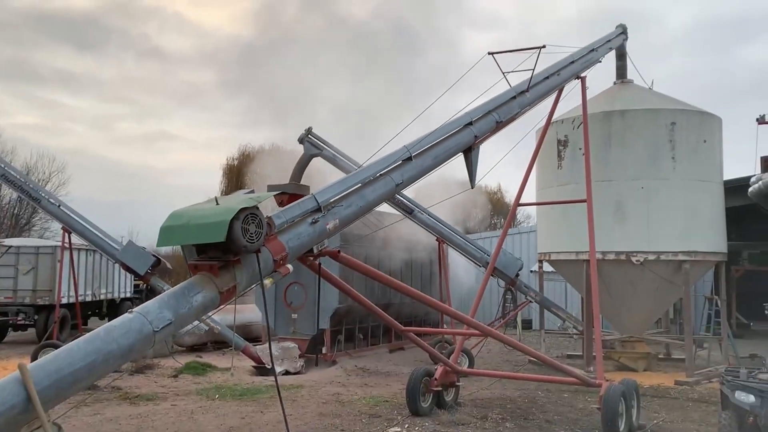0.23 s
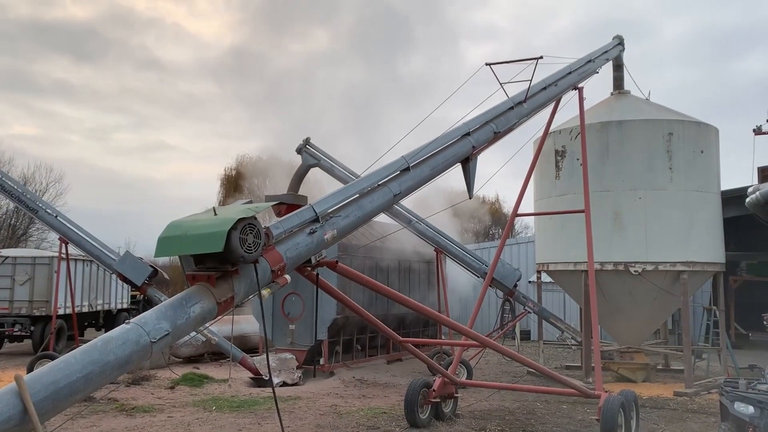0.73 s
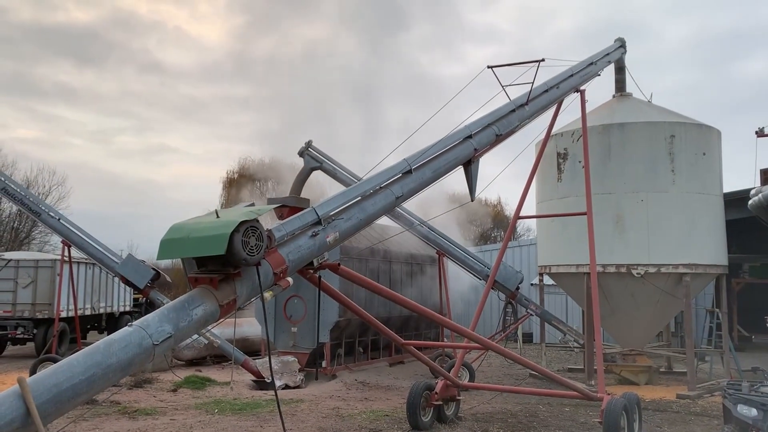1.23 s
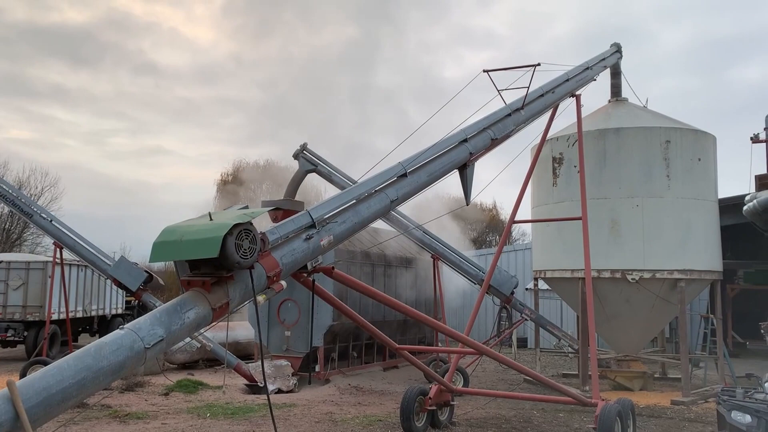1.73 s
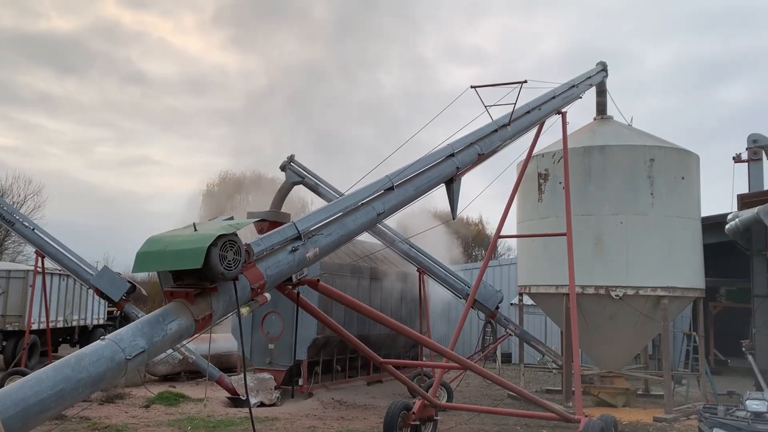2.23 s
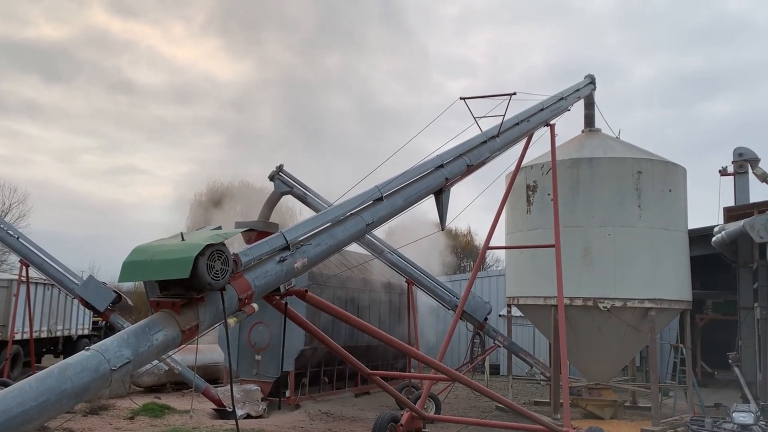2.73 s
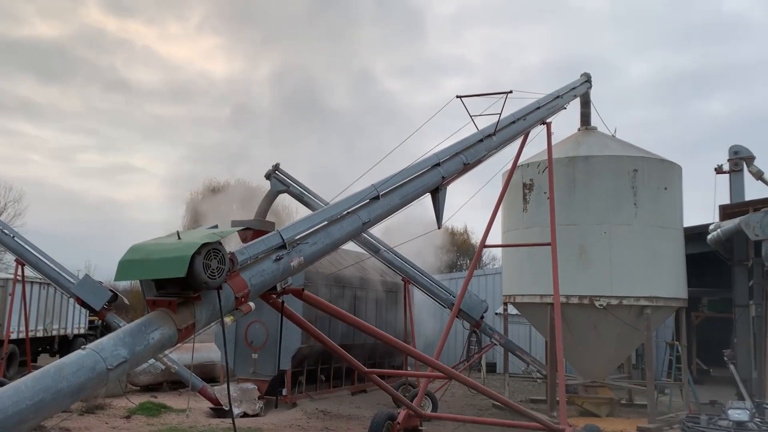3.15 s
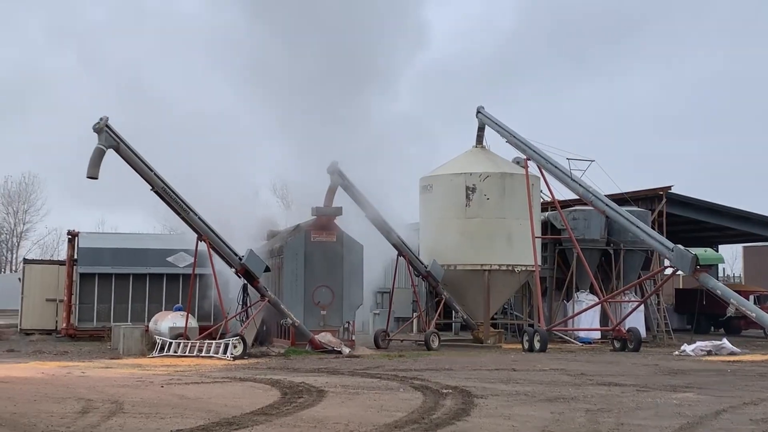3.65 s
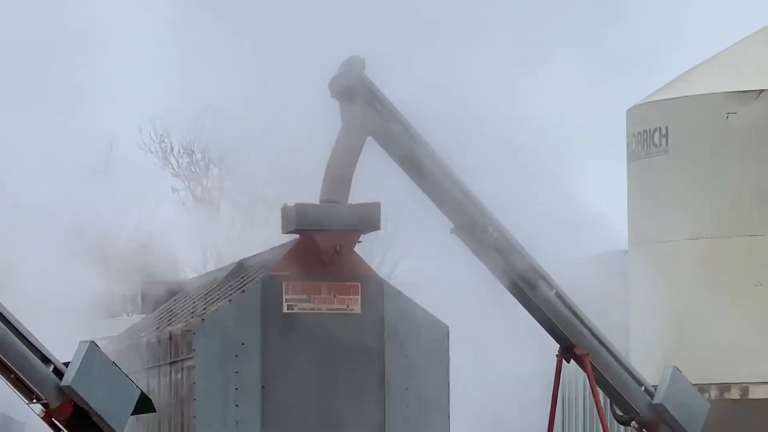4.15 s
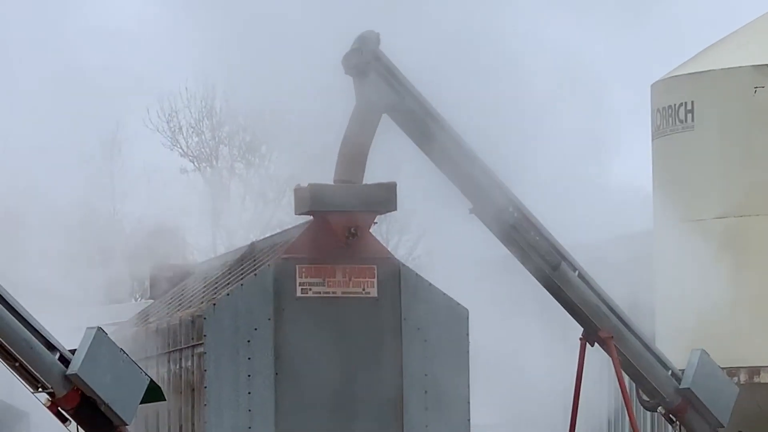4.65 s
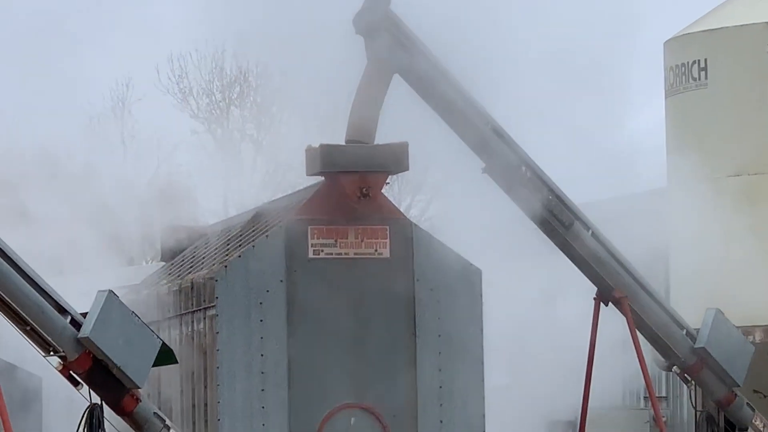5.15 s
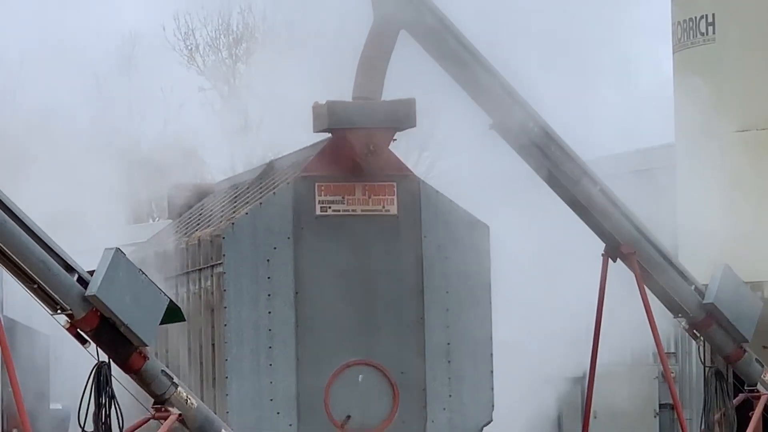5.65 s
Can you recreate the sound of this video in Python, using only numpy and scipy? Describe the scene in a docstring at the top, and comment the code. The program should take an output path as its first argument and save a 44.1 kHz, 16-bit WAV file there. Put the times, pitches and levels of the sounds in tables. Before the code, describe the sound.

Loud farm machinery drones with grain hissing through a steel auger, switching abruptly to a duller dryer roar with a few microphone knocks.

```python
"""A farm grain yard from two spots in turn, through a small stereo microphone.
0-3.35 s, beside an auger: kernels hiss and rap in the steel tube, its drive hums and whines;
behind it the dryer's fan and burner roar and its plenum howls, wavering near 240 Hz.
From 3.35 s, further off, facing the dryer: roar and howl, a surging burner boom, a fan blade tone.
At 3.6, 3.9 and 4.7 s a hand knocks the microphone case."""
import sys
import numpy as np
from scipy import signal
from scipy.fft import rfft, irfft, next_fast_len
from scipy.io import wavfile
from scipy.ndimage import uniform_filter1d

SR = 44100
rng = np.random.default_rng(int(sys.argv[2]) if len(sys.argv) > 2 else 0)


def dump(signal):
    """Clip the signal to [-1, 1] and save it as 16-bit WAV at the path in sys.argv[1]."""
    limited = np.clip(np.atleast_2d(signal).T, -1, 1)
    pcm = np.round(limited * 32767).astype(np.int16)
    wavfile.write(sys.argv[1], SR, pcm)


N = 259749
FFT_SIZE = next_fast_len(N)
HZ, T = np.fft.rfftfreq(FFT_SIZE, 1 / SR), np.arange(N) / SR


# Roar spectrum per spot: (frequency [Hz], relative density [dB])
NEAR_ROAR = [(18, -59), (30, -35), (48, -9.5), (69, -7), (91, -5), (118, -1.5), (243, -4), (276, -7.5),
             (330, -8), (439, -13.5), (538, -5.5), (809, -13.5), (903, -17), (2500, -32.5), (3250, -79),
             (5500, -120)]
FAR_ROAR = [(28, -44), (55, -4.5), (110, -0.5), (190, -6), (300, -15.5), (520, -13.5), (740, -17.5),
            (1000, -28.5), (1300, -32.5), (1650, -37), (2400, -37.5), (4000, -46.5), (6000, -51.5),
            (9000, -57), (12600, -61.5), (14500, -68), (15600, -80)]
# Roar peaks and dips; the low dips let motor hum and burner boom stand clear:
# (centre [Hz], width [Hz], gain [dB])
NEAR_PEAKS_DIPS = [(53, 9.9, 4), (68, 12, -8), (86, 12, 5), (114.3, 20, 5), (150, 8.5, -3),
                   (176.6, 15, 4.5), (186.3, 9, -6.5), (208.1, 10.4, 8), (223, 7, -3), (241, 11, 2),
                   (283, 15, -2), (686.5, 28, 7), (724, 26, 5), (770, 21, 5.5)]
FAR_PEAKS_DIPS = [(84, 32, -3.5), (122.7, 19.4, 3.5), (191, 30, -4.5), (250, 51, 7.5), (356.3, 16.4, 7.5),
                  (520, 20, -9), (612, 20, 6), (642, 20, -8.5), (739, 26, 5.5)]

def dryer_roar(spectrum, peaks_dips, image, level_db, patchy_db):
    """Turbulent air from fan and burner."""
    air = stereo_noise(rng.standard_normal(N), colour_db(spectrum, peaks_dips), image)
    return gain_of(level_db) * patchy(air, patchy_db)


# Kernel hiss spectrum: (frequency [Hz], relative density [dB])
KERNEL_SPECTRUM = [(700, 5), (1500, 0), (2950, 0), (3300, -3), (3800, -.8), (4900, .8), (6500, 2.5),
                   (7800, -1.5), (9000, 0.5), (12000, -2), (13500, -6.5), (14500, -6.5), (15600, -13.5)]

def kernel_hiss(level_db=-20, hits_per_s=14000, flight_hz=15.2):
    """Dense kernel hits in the tube, pushed in small heaps by each turn of the auger flight."""
    hits = rng.standard_normal(N) * (rng.random(N) < hits_per_s / SR)
    hits *= gain_of(0.87 * rng.standard_normal(N))
    heaps_db = 0.55 * np.sin(2 * np.pi * flight_hz * T) + 0.33 * drift(40)
    hiss = stereo_noise(evened(hits), colour_db(KERNEL_SPECTRUM), NEAR_IMAGE)
    return patchy(hiss, depth_db=1.7) * gain_of(level_db + heaps_db)


# Burner surges: (time [s], level [dB], width [s], pitch [Hz])
BURNER_SURGES = [(3.39, -18, 0.041, 84), (3.49, -14, 0.064, 83.9), (3.68, -22, 0.06, 84.6),
                 (3.815, -10, 0.082, 84), (4.0, -18.5, 0.066, 86.6), (4.29, -18, 0.093, 84),
                 (4.46, -17, 0.091, 81.4), (4.56, -20, 0.039, 84), (4.66, -19, .04, 81.8),
                 (4.76, -22, 0.04, 82.4), (4.9, -18, 0.063, 84), (5.05, -14.5, 0.076, 81.15),
                 (5.14, -19, 0.024, 87.8), (5.409, -23, 0.051, 92.4), (5.54, -19, 0.06, 95.7),
                 (5.72, -12, 0.043, 87.5)]

def burner_boom(base_db=-24.5):
    """The burner booms unevenly, surging above a wavering base level."""
    level_db = swelling_db(base_db + 2.4 * drift(25), BURNER_SURGES)
    pitch_hz = column(BURNER_SURGES, T, index=3)
    return tone(pitch_hz, level_db, FAR_IMAGE, wander_hz=2.4, waver_db=0.81, pace_hz=19)


# Loudest moments of the howls, each at its own pitch: the wavering howl near 240 Hz and a second, lower one
# near 210 Hz: # (time [s], level [dB], width [s], pitch [Hz])
HOWL_MOMENTS = [(.2, -32, 0.095, 245), (0.507, -14.5, 0.044, 243), (.6, -17.5, 0.089, 240),
                (0.678, -17.5, 0.056, 240.2), (0.858, -15.5, 0.028, 222), (1.22, -14, 0.035, 247.9),
                (1.372, -13.5, 0.044, 240), (1.49, -18, 0.037, 243), (1.629, -15.5, 0.043, 215),
                (2.262, -14.5, 0.039, 242.8), (2.415, -22, 0.034, 240), (2.53, -21, 0.023, 247.5),
                (2.78, -18, 0.14, 209), (3.002, -20, .08, 238), (3.561, -13.5, 0.044, 241.5),
                (3.981, -18.5, 0.037, 232), (4.3, -23, 0.051, 245.2), (4.61, -20, 0.056, 250),
                (4.765, -15.5, 0.032, 239.6), (4.952, -16, 0.051, 262.1), (5.08, -17.5, 0.026, 258.4),
                (5.311, -14, 0.032, 231.7), (5.68, -18, 0.031, 250), (5.84, -17, 0.033, 242)]

def plenum_howl(image, base_hz=242.5, base_db=-27.5, floor_db=-61):
    """A noisy plenum howl near 242 Hz, wavering in pitch and level, with brief louder swells each held at its
    own pitch; those near 210 Hz come from a second, lower howl."""
    flutter_db = base_db + 3.7 * drift(60)
    time_s, _, _, pitch_hz = np.transpose(HOWL_MOMENTS)
    midpoints_s = (time_s[1:] + time_s[:-1]) / 2
    loud_hz = pitch_hz[np.searchsorted(midpoints_s, T)]
    loud_db = swelling_db(floor_db, HOWL_MOMENTS)
    loud = tone(loud_hz, loud_db, image, wander_hz=2.95, waver_db=1, pace_hz=20)
    return loud + tone(base_hz, flutter_db, image, wander_hz=5.73, waver_db=1.3, pace_hz=25.08)


# Auger drive partials: (harmonic [n], level [dB])
DRIVE_PARTIALS = [(9, -28), (11, -47), (16, -48), (18, -51), (19, -47), (20, -50)]

def auger_drive(drive_hz=90.94, hum_hz=67.4, hum_db=-21):
    """Drive whine over a low motor hum."""
    whine = sum(tone(harmonic * drive_hz, db, NEAR_IMAGE, wander_hz=0.4, waver_db=1.4)
                for harmonic, db in DRIVE_PARTIALS)
    return whine + tone(hum_hz, hum_db, NEAR_IMAGE, wander_hz=0.19, waver_db=0.49)


# Blade tone envelope: (time [s], level [dB])
BLADE_LEVELS = [(3.35, -32), (3.85, -41), (3.95, -26), (4.14, -20.5), (4.3, -33), (4.6, -30), (4.9, -25),
                (5.4, -21.5), (5.89, -22)]

def fan_blades(blade_hz=177):
    """The fan blades sing a nearly steady pitch."""
    return tone(blade_hz, column(BLADE_LEVELS, T), FAR_IMAGE, wander_hz=1.37, waver_db=3, pace_hz=9)


# Case knocks: (time [s], gain [dB], start pitch [Hz], time to half pitch [s], rise [s], t60 [s])
CASE_KNOCKS = [(3.6284, 8, 880, .00152, .0024, .066), (3.6294, -5, 13000, .0003, .0035, .007),
               (3.9017, -3, 16000, .00018, .0035, .011), (4.7147, -3.5, 14000, .0002, .0035, .006)]

def case_knocks():
    """A hand knocks the case: highs arrive first, lows follow, in a falling sweep."""
    left = np.zeros(N)
    for time_s, db, start_hz, halving_s, rise_s, t60_s in CASE_KNOCKS:
        age_s = np.maximum(T - time_s, 0)
        cycles = start_hz * halving_s * np.log(1 + age_s / halving_s)
        attack = 1 - np.exp(-age_s / rise_s)
        left -= gain_of(db - 60 * age_s / t60_s) * attack * np.sin(2 * np.pi * cycles)
    _, lead_rad, _ = image_at(FAR_IMAGE, HZ)
    right = irfft(rfft(left, FFT_SIZE) * np.exp(-1j * lead_rad), FFT_SIZE)[:N]
    return np.array([left, right])


# Steel tube modes: (frequency [Hz], relative level [dB], t60 [s])
TUBE_MODES = [(1020, 3, 0.024), (1300, 1, 0.029), (1910, -1.5, .02), (2590, -5, 0.015), (4500, 1.5, 0.019),
              (4950, 3.5, .015), (6480, 6, .012)]

def kernel_raps(level_db=-34, raps_per_s=200):
    """Large kernels hit with uneven force, each ringing one mode of the tube."""
    force_db = 3.4 * np.minimum(rng.exponential(1, N), 4)
    hits = gain_of(force_db) * (rng.random(N) < raps_per_s / SR)
    struck_mode = rng.integers(0, len(TUBE_MODES), N)
    age_s, ringing = T[:2048], np.zeros(N)
    for mode, (hz, db, t60_s) in enumerate(TUBE_MODES):
        ring = gain_of(db - 60 * age_s / t60_s) * np.sin(2 * np.pi * hz * age_s)
        ringing += signal.oaconvolve(hits * (struck_mode == mode), ring)[:N]
    _, lead_rad, balance_db = image_at(NEAR_IMAGE, HZ)
    spectrum = rfft(evened(ringing), FFT_SIZE)
    pair = panned(spectrum, spectrum * np.exp(-1j * lead_rad), balance_db)
    return gain_of(level_db) * irfft(pair, FFT_SIZE)[:, :N]


# Stereo image, shared bass then per spot; treble wide near 11.7 kHz, centred near 14 kHz:
# (frequency [Hz], likeness [0-1], left lead [rad], left minus right [dB])
BASS_IMAGE = [(0, .992, 0, .3), (120, .985, 0, .2)]
NEAR_IMAGE = [(290, 0.92, 0.097, 0.5), (705, 0.66, 0.65, 4), (1150, 0.47, 0.45, 1), (1750, 0.02, 3.1, -1.5),
              (2250, 0.47, 7.1, -0.5), (3300, 0.51, 10.03, -2.5), (3970, 0.5, 11.3, 0),
              (4530, 0.7, 12.1, -4), (5450, 0.53, 15, -7), (5530, 0.34, 17.3, -2), (6400, 0.2, 14.4, -6),
              (7230, 0.6, 15.4, 1), (7960, .6, 14.46, 1), (8930, 0.92, 12.4, -0.5), (10000, 0.8, 11.8, .1),
              (10760, 0.77, 10.6, 1), (11150, .999, 9.43, .02), (12250, .999, 9.41, .02),
              (12630, 0.7, 7.8, 2), (13300, .98, 6.4, .1), (14600, .98, 6.2, -1), (15400, .9, 3.2, .1)]
FAR_IMAGE = [(302, 0.97, 0.08, .1), (520, 0.88, 0.32, 0), (800, 0.89, -0.2, .9), (1260, 0.67, -.9, 3),
             (1540, 0.11, -3, -0.5), (2220, 0.8, -1, -2), (3320, .7, 2, -4.5), (3970, .55, 1.7, -2.5),
             (4670, .1, 4, -7.5), (5600, 0.54, 3.5, -4.5), (6540, 0.58, 5.5, -3), (6940, .1, 9.5, 2),
             (7630, 0.79, 9, -1), (9000, .93, 6.5, 1), (10000, .8, 6.5, .1), (10700, .8, 4.5, .1),
             (11240, 1, 3.5, .05), (12200, .99, 3.1, .05), (12700, .8, 1.5, .1), (13300, .98, 0.5, .1),
             (14600, .95, -.1, -1), (15400, .6, -2.8, 1)]

def image_at(image, hz):
    """Likeness, phase lead and balance of the two channels at hz."""
    return [column(BASS_IMAGE + image, hz, index) for index in (1, 2, 3)]


def stereo_noise(white, spectrum_db, image):
    """White source to coloured stereo, rms 1; right is phase-shifted and partly independent."""
    shared, independent = rfft(white, FFT_SIZE), rfft(rng.standard_normal(N), FFT_SIZE)
    likeness, lead_rad, balance_db = image_at(image, HZ)
    likeness = np.clip(likeness, 0, 1)
    right = likeness * shared * np.exp(-1j * lead_rad) + np.sqrt(1 - likeness ** 2) * independent
    pair = panned(shared, right, balance_db) * gain_of(spectrum_db)
    return evened(irfft(pair, FFT_SIZE)[:, :N])


def tone(hz, db, image, wander_hz, waver_db, pace_hz=4.9):
    """Stereo sine with drifting pitch and level."""
    phase = 2 * np.pi * (np.cumsum(hz + wander_hz * drift(pace_hz)) / SR + rng.random())
    _, lead_rad, balance_db = image_at(image, np.mean(hz))
    pair = panned(np.sin(phase), np.sin(phase - lead_rad), balance_db)
    return np.sqrt(2) * gain_of(db + waver_db * drift(pace_hz)) * pair


def panned(left, right, balance_db):
    """Stereo pair, left raised over right by balance_db."""
    return np.array([left * gain_of(balance_db / 2), right * gain_of(-balance_db / 2)])


def patchy(pair, depth_db):
    """Patches a few hundred Hz wide swell and fade at random, alike in both channels."""
    frames = signal.stft(pair, nperseg=512, noverlap=384)[2]
    patches = uniform_filter1d(rng.standard_normal(frames.shape[1:]), size=4, axis=0)
    patches = uniform_filter1d(patches, size=10, axis=1)
    frames *= gain_of(depth_db * evened(patches))
    return signal.istft(frames, nperseg=512, noverlap=384)[1][:, :N]


def colour_db(spectrum, peaks_dips=()):
    """Spectrum interpolated over log frequency, plus peaks and dips."""
    hz, db = np.transpose(spectrum)
    bumps_db = sum(gain_db / (1 + (2 * (HZ - centre_hz) / width_hz) ** 2)
                   for centre_hz, width_hz, gain_db in peaks_dips)
    return np.interp(np.log(HZ + 1), np.log(hz), db, left=-60) + bumps_db


def swelling_db(base_db, swells):
    """Base level plus bell-shaped swells; widths at half height."""
    bells = sum(gain_of(db) * np.exp(-4 * np.log(2) * ((T - time_s) / width_s) ** 2)
                for time_s, db, width_s, _ in swells)
    return 20 * np.log10(gain_of(base_db) + bells)


def drift(top_hz):
    """Slow random motion up to top_hz, rms 1."""
    coarse_s = T[::64]
    slow = sum(np.sin(2 * np.pi * (hz * coarse_s + rng.random())) / np.sqrt(hz)
               for hz in np.geomspace(top_hz / 20, top_hz, num=24))
    return np.interp(T, coarse_s, evened(slow))


def column(rows, at, index=1):
    """Table column, interpolated linearly against the first."""
    rows = np.array(rows, float)
    return np.interp(at, rows[:, 0], rows[:, index])


def evened(x):
    """Scaled to rms 1."""
    return x / np.sqrt(np.mean(abs(x) ** 2) + 1e-20)


def gain_of(db):
    """Decibels to gain."""
    return 10 ** (np.asarray(db) / 20)


def scene(switch_s=3.3525, fade_s=0.0014):
    """Auger spot fades out quickly, dryer spot fades in."""
    near = dryer_roar(NEAR_ROAR, NEAR_PEAKS_DIPS, NEAR_IMAGE, level_db=-14.5, patchy_db=1.1)
    near += plenum_howl(NEAR_IMAGE) + kernel_hiss() + kernel_raps() + auger_drive()
    far = dryer_roar(FAR_ROAR, FAR_PEAKS_DIPS, FAR_IMAGE, level_db=-14, patchy_db=0.6)
    far += plenum_howl(FAR_IMAGE) + burner_boom() + fan_blades() + case_knocks()
    return near * np.clip((switch_s - T) / fade_s, 0, 1) + far * np.clip((T - switch_s) / fade_s, 0, 1)


def record(dry):
    """Peaks round off near full scale, then a low-pass limits the band."""
    edge_hz = 15680
    rounded = dry / (1 + dry ** 16) ** (1 / 16)
    lowpass = signal.firwin(1023, edge_hz, window=("kaiser", 9), fs=SR)
    return signal.oaconvolve(rounded, lowpass[None], "same")


dry = scene()
out = record(dry)
dump(out)
```